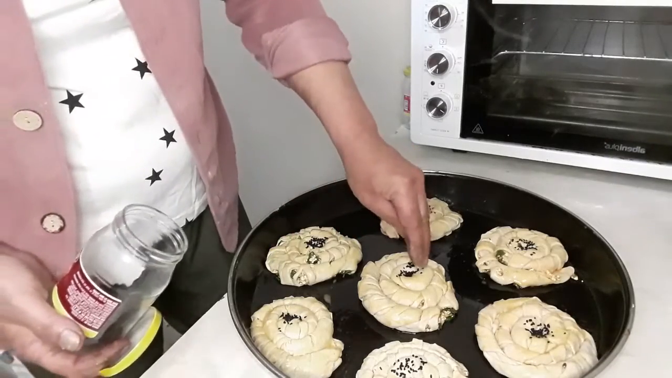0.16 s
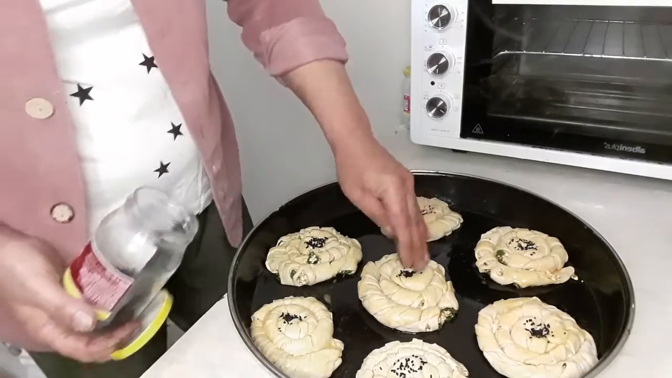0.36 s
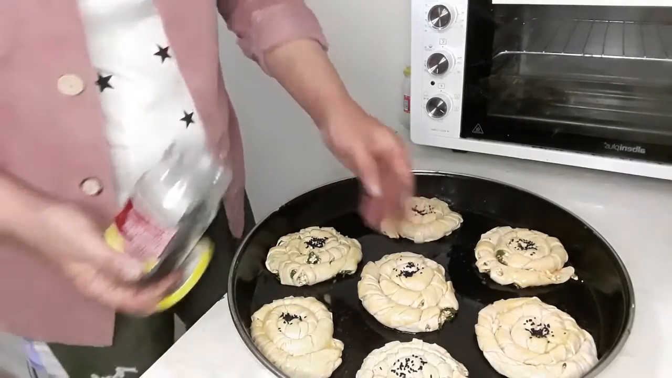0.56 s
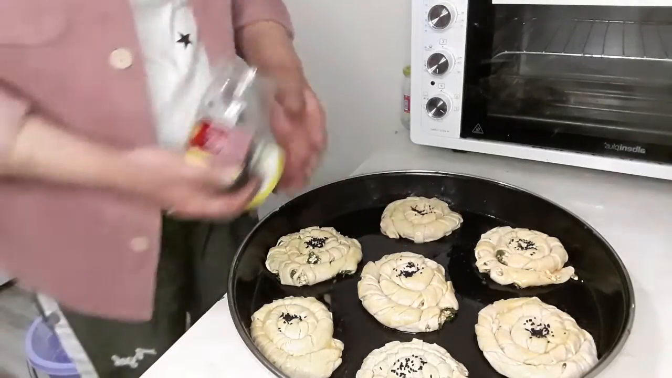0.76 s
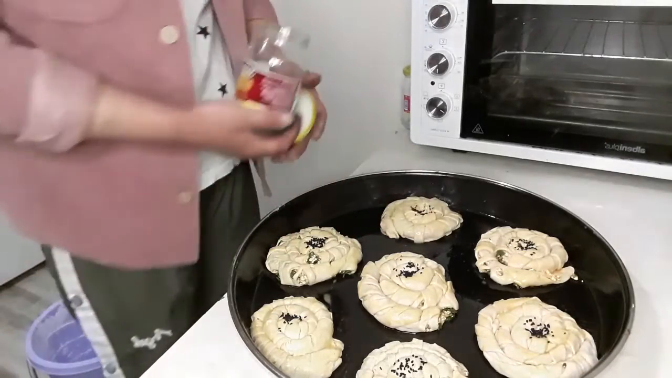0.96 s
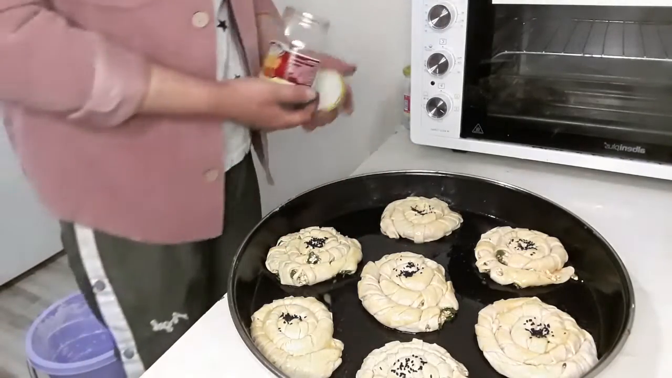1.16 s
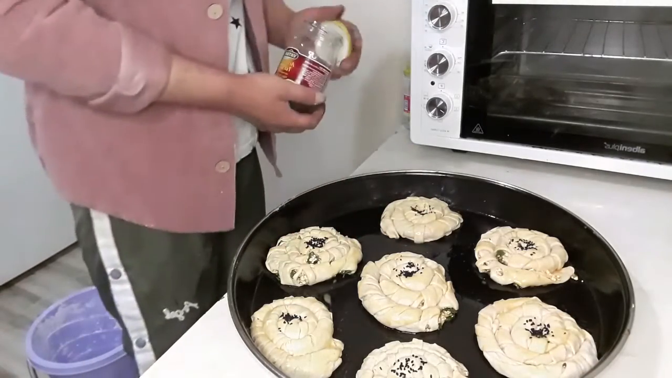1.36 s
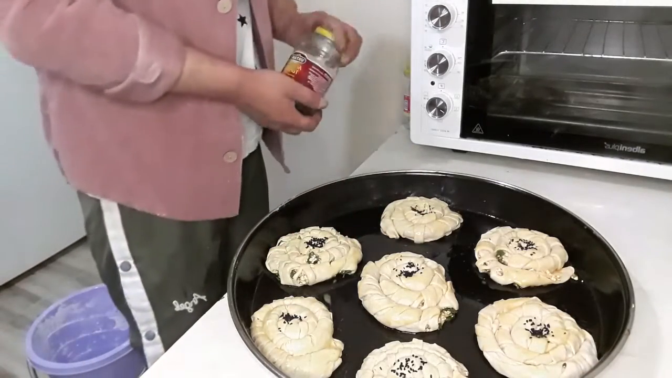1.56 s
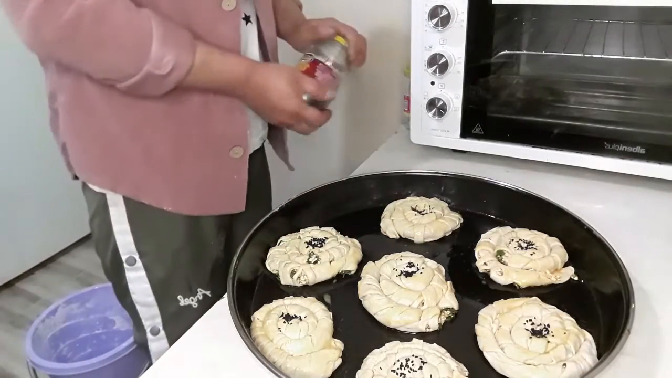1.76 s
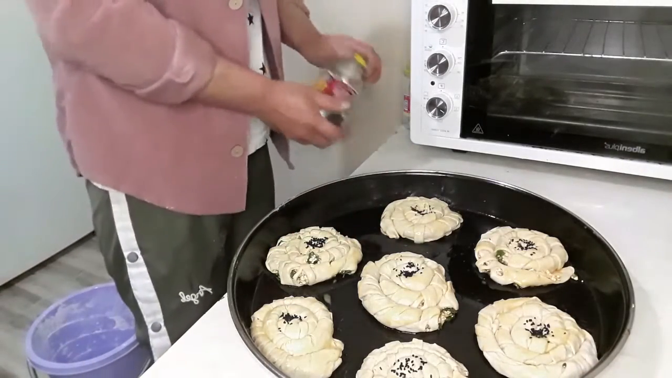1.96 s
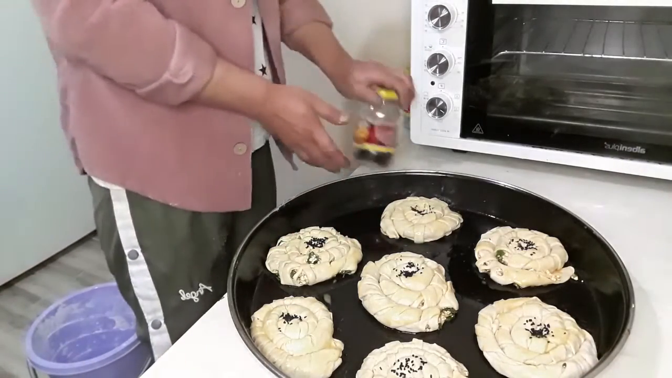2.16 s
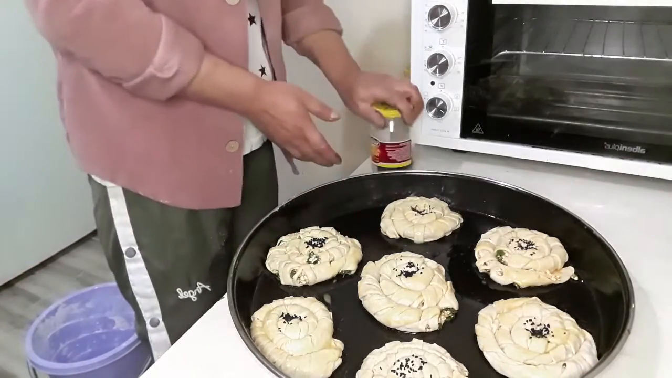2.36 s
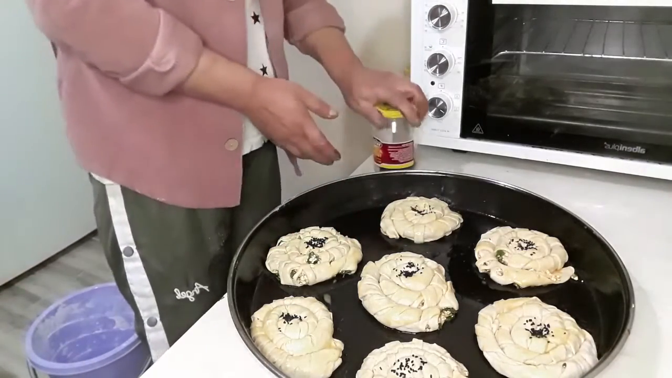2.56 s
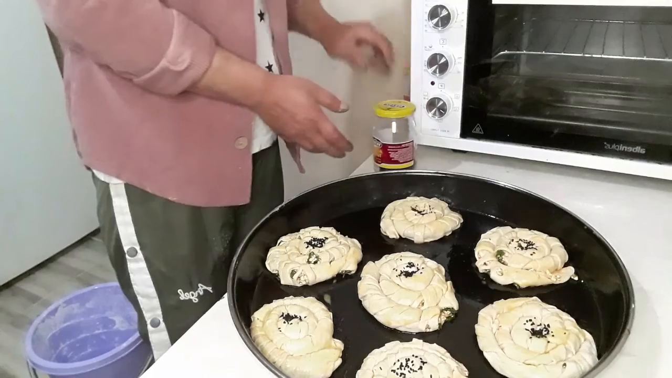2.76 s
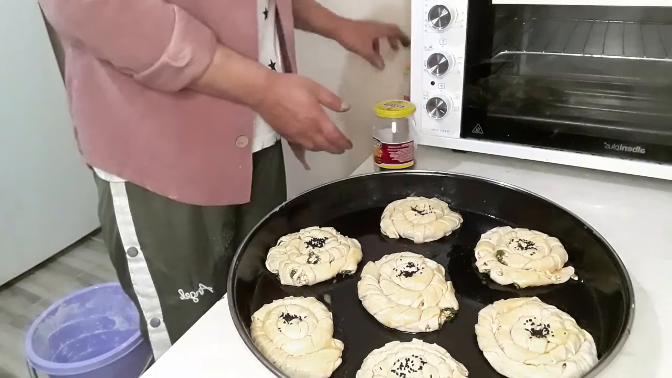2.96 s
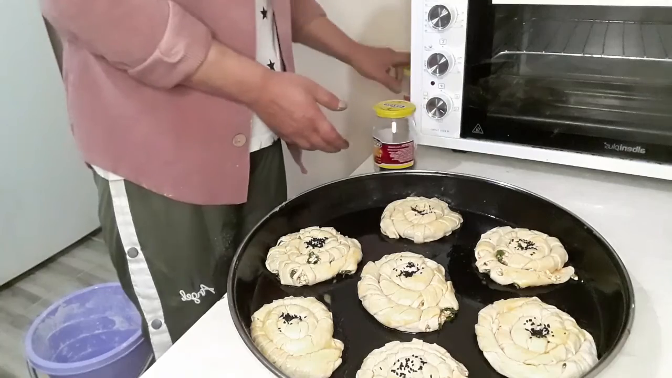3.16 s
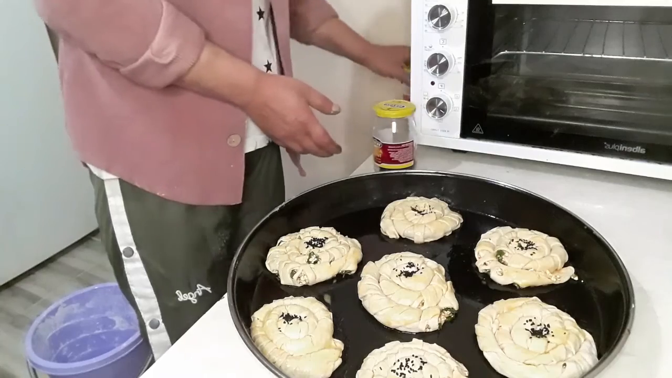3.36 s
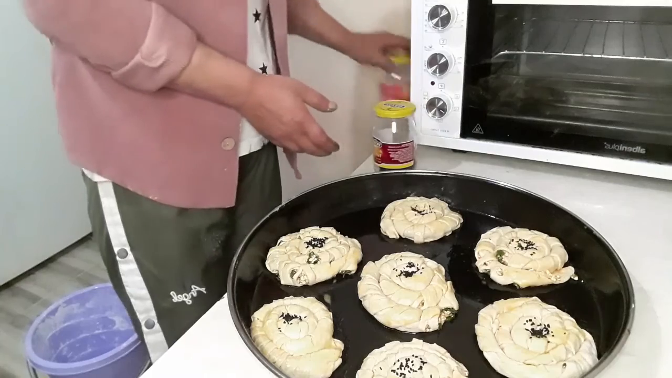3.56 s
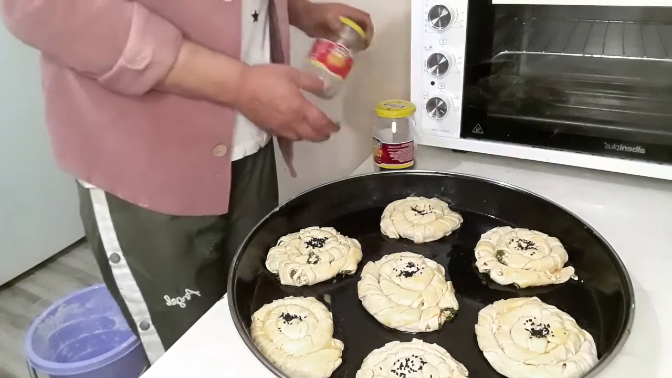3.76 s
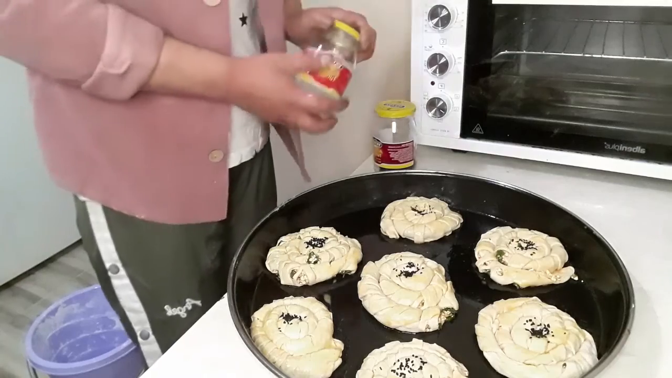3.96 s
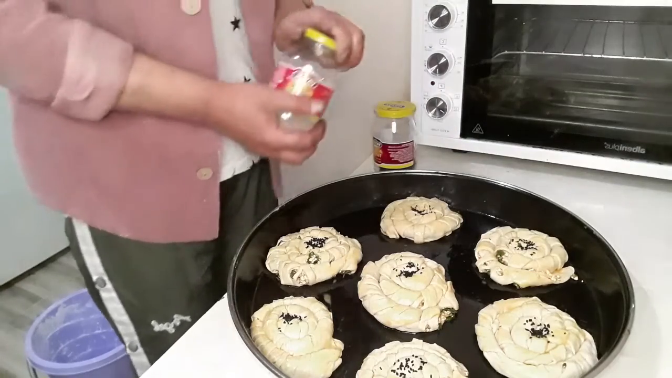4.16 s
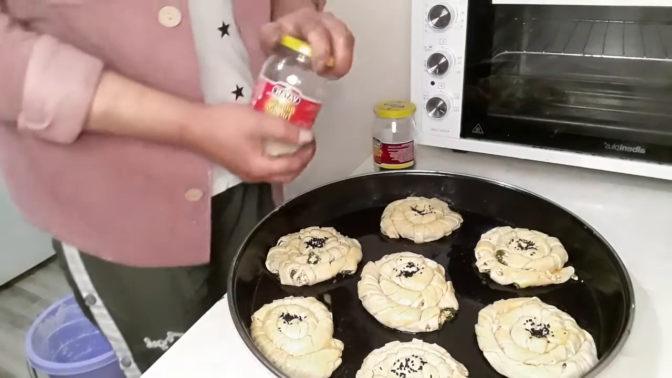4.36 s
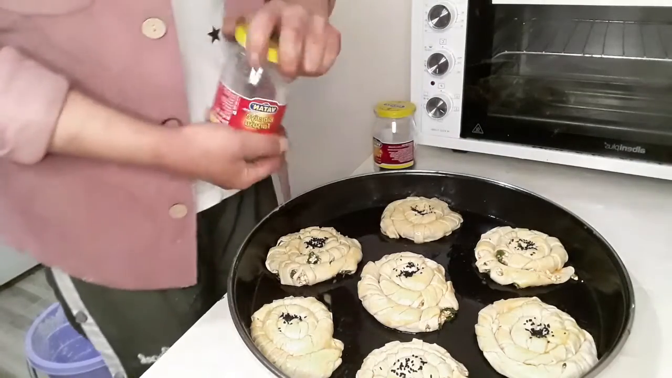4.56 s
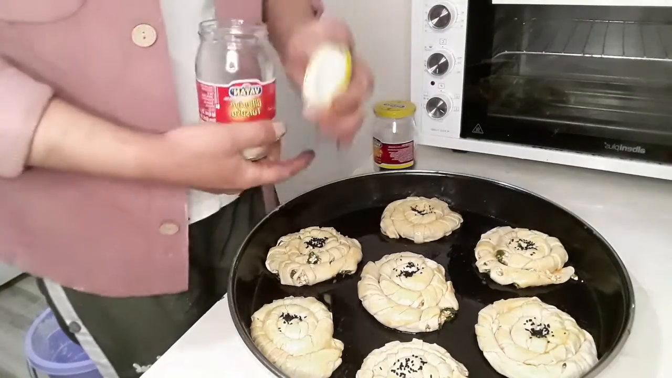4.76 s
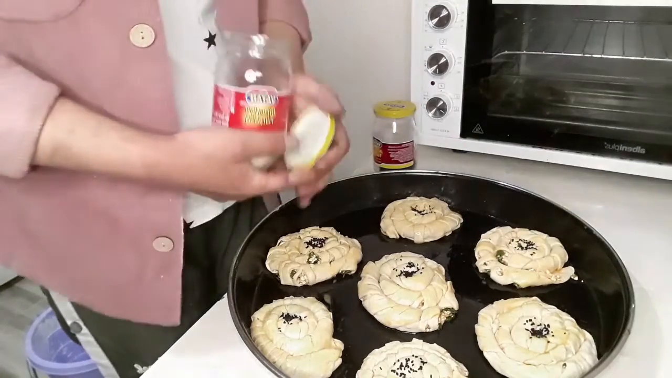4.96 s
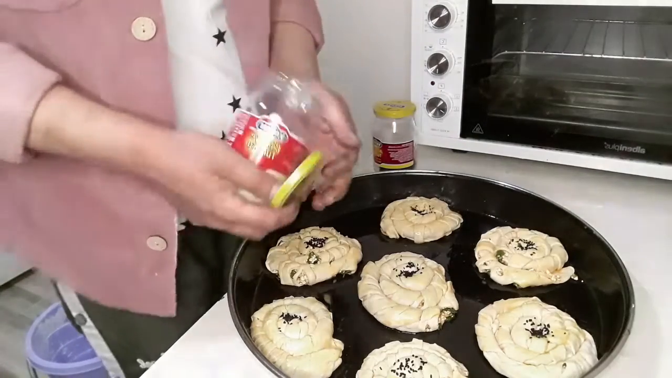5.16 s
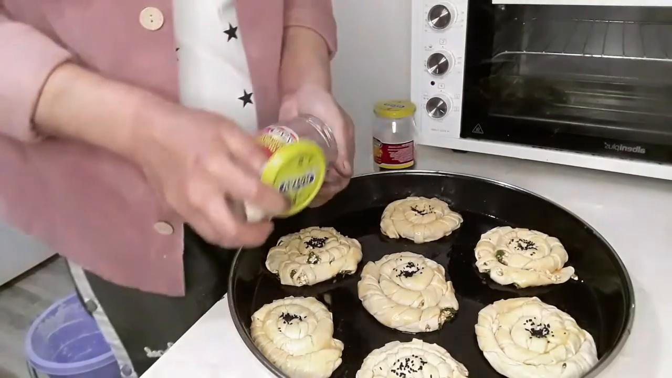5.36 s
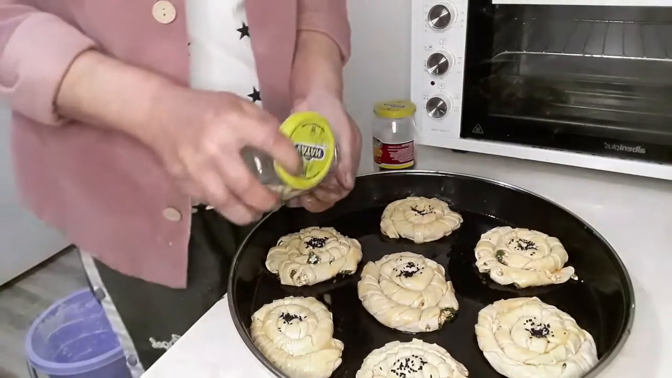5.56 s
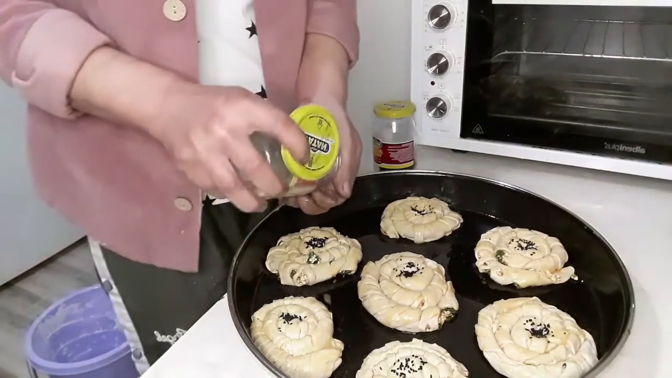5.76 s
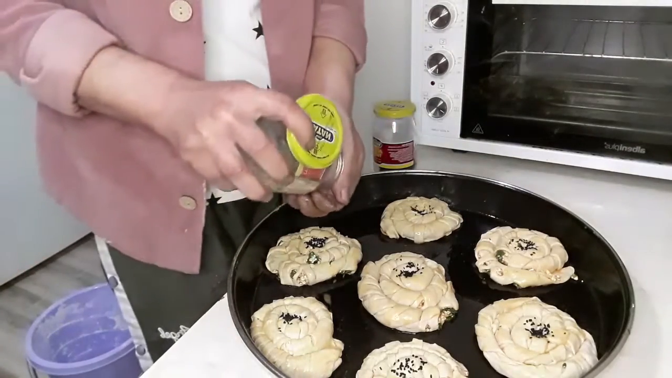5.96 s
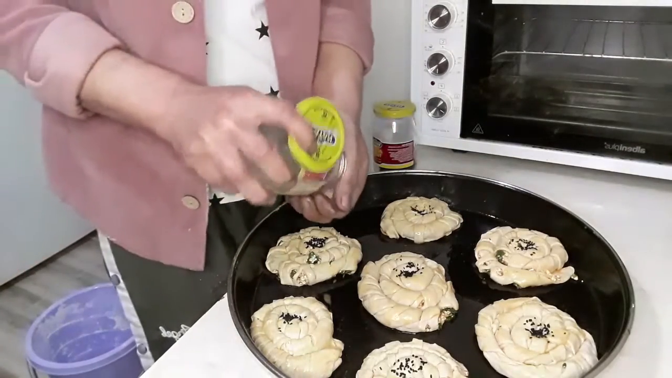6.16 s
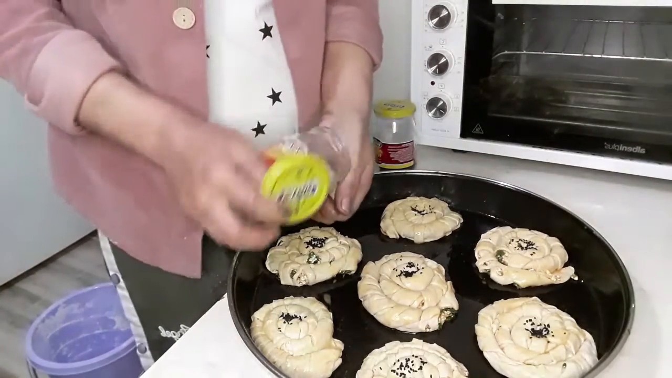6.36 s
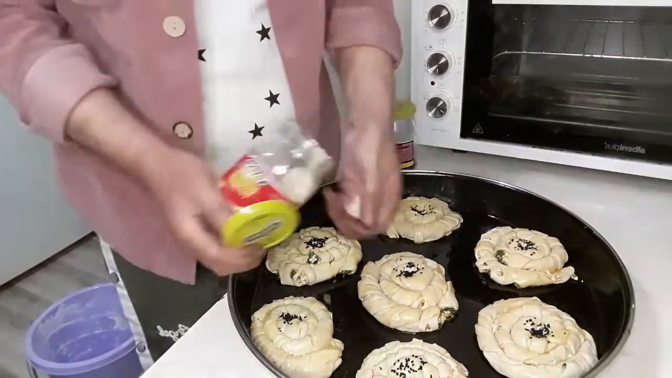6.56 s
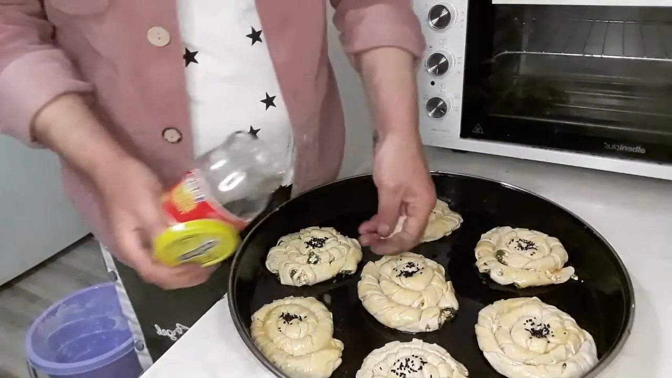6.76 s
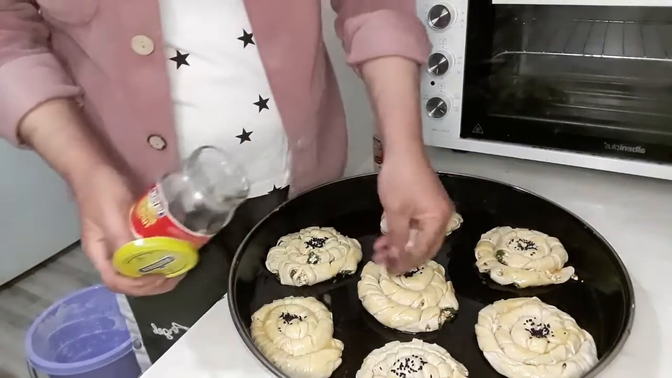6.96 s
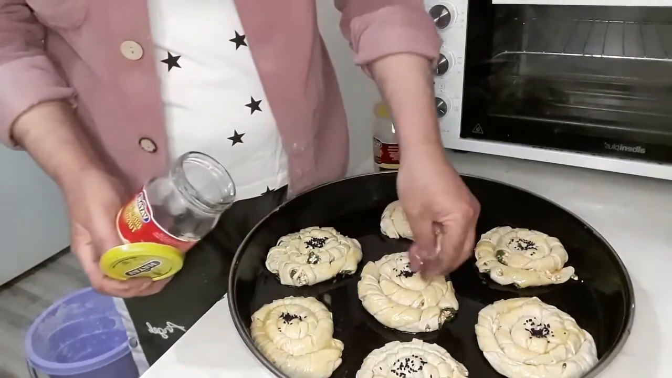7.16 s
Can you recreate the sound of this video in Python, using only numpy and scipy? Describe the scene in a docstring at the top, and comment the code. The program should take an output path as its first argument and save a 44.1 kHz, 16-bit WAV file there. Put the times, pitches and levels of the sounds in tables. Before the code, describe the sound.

A small jar is snapped shut and set down with rocking knocks; a larger jar scrapes away, pops open, and its lid clacks on glass.

```python
"""Plastic lids tap and snap over glass jars: short random contact forces excite damped modes of lid, glass and air.
The scene is a small, hard-walled kitchen. A small jar is lidded and lands on the countertop in rocking knocks;
a larger jar scrapes off by stick-slip friction, its lid pops by air resonance and clacks against its base.
Seeds patter as random grains in resonant glass, sleeves and fingertips hiss as bands of noise,
and an appliance hums in unsteady sines over the soft rush of the room."""
import sys
import numpy as np
from scipy import signal
from scipy.fft import rfft, irfft, next_fast_len
from scipy.io import wavfile
from scipy.ndimage import uniform_filter1d, map_coordinates

SR = 44100
rng = np.random.default_rng(int(sys.argv[2]) if len(sys.argv) > 2 else 0)


def wav_record(signal):
    """Record a signal, one row per channel, as 16-bit PCM in the file named by sys.argv[1]."""
    frames = np.transpose(np.atleast_2d(signal))
    bounded = np.clip(frames, -1, 1)
    # unit amplitude maps onto the largest positive 16-bit level
    quanta = np.round(bounded * 32767).astype(np.int16)
    wavfile.write(sys.argv[1], SR, quanta)


N = 318560
T = np.arange(SR) / SR  # the second after a blow
CLOCK = np.arange(N) / SR

# ringing modes of the small lid, the large lid and the jar's glass: [f/Hz, level/dB]
SMALL_LID = [(1190, -12), (2110, -7), (2460, -13.5), (3149, -14.5), (3830, -4), (4075, -2), (6030, -14.5)]
LARGE_LID = [(1620, -6.5), (2230, -3.5), (2855, -4.5), (3080, -4.5), (3710, -1.5), (4030, -6), (4660, -8.5),
             (5500, -7.5), (6300, -9), (8390, -4)]
GLASS = [(1760, -24), (2845, -7), (3830, -23.5), (5380, -24.5), (6470, -22)]
# force spectra of a cracking contact and of a jar's jolted body: [f/Hz, relative density/dB per Hz]
CRACK = [(40, -80), (300, -21), (900, -22.5), (1500, -4.5), (2100, -6), (2600, 3.5), (4000, 4),
         (5200, -1.5), (7500, -6), (10000, -10), (14000, -9.5), (16000, -18)]
BODY = [(30, -53.5), (125, -6), (200, -7), (320, 1), (450, 4.5), (700, 3.5), (1300, -10), (2500, -31.5),
        (8000, -66.5)]


def amp(db):
    """Level definition: decibels to amplitude gain."""
    return 10 ** (np.asarray(db) / 20)


def unit(x):
    """Power normalisation: x at rms 1."""
    return x / np.sqrt(np.mean(x ** 2) + 1e-20)


def blow(x, db):
    """Energy normalisation: x with the energy of 6 ms at the given rms level."""
    return amp(db) * x * np.sqrt(0.006 * SR / np.sum(x ** 2))


def along(points, hz):
    """Logarithmic pitch: (f/Hz, value) points read on a log-frequency axis."""
    f, v = np.transpose(points)
    return np.interp(np.log(hz + 1), np.log(f), v)


def add(track, s, x):
    """Superposition: mix x into the track from time s."""
    part = track[round(s * SR):][:len(x)]
    part += x[:len(part)]


def wobble(rate):
    """Slow fluctuation: a smooth curve through random knots, rate a second."""
    knots = rng.standard_normal(int(N * rate / SR) + 4)
    return map_coordinates(knots, [CLOCK * rate])


def filtered(x, response):
    """Linear filtering: the spectrum of x times a response of frequency."""
    m = next_fast_len(x.shape[-1] + SR // 2)
    spectrum = rfft(x, m) * response(np.fft.rfftfreq(m, 1 / SR))
    return irfft(spectrum, m)[..., :x.shape[-1]]


def resonate(x, peaks):
    """Forced resonance: x through parallel damped oscillators (f/Hz, width/Hz, peak gain/dB)."""
    def response(f):
        return sum(amp(db) * 1j * f * w / (c * c - f * f + 1j * f * w) for c, w, db in peaks)
    return filtered(x, response)


def causal(gain):
    """Minimum phase: the response with these gains that rings only after the blow."""
    cepstrum = irfft(np.log(gain), SR)
    cepstrum[1:SR // 2] *= 2
    cepstrum[SR // 2 + 1:] = 0
    return np.exp(rfft(cepstrum))


def flurry(envelope):
    """Broadband excitation: a force of microscopic touches, evened out over frequency."""
    force = rfft(rng.choice([-1, 1], SR) * envelope)
    smooth_gain = np.sqrt(uniform_filter1d(abs(force) ** 2, size=120))
    return irfft(force / causal(smooth_gain), SR)


def burst(spectrum, bright_db, t60):
    """Contact force: a decaying flurry through a causal colour; a harder touch tilts it to the treble."""
    hz = np.fft.rfftfreq(SR, 1 / SR)
    tilt_db = bright_db * np.log2(1 + hz / 500)
    colour = causal(amp(along(spectrum, hz) + tilt_db))
    force = flurry(amp(-60 * (T / t60) ** 0.91))
    return irfft(rfft(force) * colour, SR)


def tone(hz, t60, rise_s=0.0004):
    """Damped oscillation: one mode builds up during contact and decays exponentially."""
    vibration = np.sin(2 * np.pi * (hz * T + rng.random()))
    return vibration * amp(-60 * T / t60) * (1 - np.exp(-T / rise_s))


def ring(modes, t60):
    """Modal superposition: a struck object's modes share the decay that the grip allows."""
    return sum(rng.choice([-1, 1]) * amp(db + rng.normal(0, 1)) * tone(hz, t60) for hz, db in modes)


def soften(x, db):
    """Contact duration: a gentler snap touches for longer and loses its top."""
    full_snap_db, dulling = -26, 0.5
    top_hz = 18000 * amp(dulling * (db - full_snap_db))
    return signal.sosfilt(signal.butter(2, top_hz, fs=SR, output="sos"), x)


def held(length):
    """Finite contact: nearly full strength for a short time, then quickly gone."""
    return np.exp(-(T / length) ** 4)


def swell(s, length):
    """Gaussian envelope: a soft rise and fall around time s."""
    return np.exp(-(2 * (CLOCK - s) / length) ** 2)


def stroke(s, length, attack_s, fall_db_per_s):
    """Friction envelope: a linear rise from time s, a hold to s + length, an exponential fall."""
    attack = np.clip((CLOCK - s) / attack_s, 0, 1)
    return attack * amp(-fall_db_per_s * np.maximum(CLOCK - s - length, 0))


def grains(rate):
    """Poisson-like impacts: tiny random blows at random moments, rate a second on average."""
    return (rng.random(N) < rate / SR) * rng.standard_normal(N)


def hiss(hz, octaves):
    """Band noise: a Gaussian band on a log-frequency axis at rms 1."""
    band = lambda f: np.exp(-0.5 * (np.log2((f + 1) / hz) / octaves) ** 2)
    return unit(filtered(rng.standard_normal(N), band))


def in_room(x, room_db, build_s=0.00091):
    """Diffuse reverberation: x plus a dense random tail, redrawn each time as places differ."""
    # decay of the kitchen's reverberation: [f/Hz, t60/s]
    kitchen_decay = [(100, 1), (220, 1), (400, 0.56), (2000, 0.41), (5000, 0.4), (12000, 0.28)]
    hz, t, z = signal.stft(rng.standard_normal(SR), SR, nperseg=512)
    decay = amp(-60 * t / along(kitchen_decay, hz)[:, None])
    tail = signal.istft(z * decay, SR, nperseg=512)[1][:SR]
    spectrum = rfft(tail * (1 - np.exp(-T / build_s)))
    spectrum /= np.sqrt(uniform_filter1d(abs(spectrum) ** 2, size=60))  # the walls return all bands evenly
    response = irfft(1 + amp(room_db) * spectrum, SR)[:3 * SR // 4]  # 1 is the direct sound
    return signal.fftconvolve(x, response)[:len(x)]


def background():
    """Periodic and turbulent noise: an appliance motor's unsteady sines over the room's soft rush."""
    # partials of the hum: [f/Hz, level/dB]
    partials = [(49.5, -80), (99, -65.5), (199.5, -73.5), (300, -73.5), (399, -75.5), (442, -71.5),
                (1082, -84)]
    # spectrum of the rush: [f/Hz, relative density/dB per Hz]
    rush_spectrum = [(25, -18.5), (50, -8), (62, -19), (80, -10.5), (130, -5.5), (220, -13), (440, -8.5),
                     (620, -20), (820, -24), (1050, -25.5), (1400, -31.5), (2500, -32.5), (3900, -27),
                     (6000, -35.5), (15000, -38.5)]
    hum = 0
    for hz, db in partials:
        phase = 2 * np.pi * hz * CLOCK + 0.55 * wobble(1.32)
        hum = hum + amp(db + 0.43 * wobble(18)) * np.sin(phase)
    rush = unit(filtered(rng.standard_normal(N), lambda hz: amp(along(rush_spectrum, hz))))
    return hum + amp(-65 + 0.55 * wobble(3.2)) * rush


def brushing():
    """Friction noise: sleeves and fingertips brush past in soft swells of band noise."""
    # a sleeve sweeps over the jacket: [t/s, level/dB, length/s, centre f/Hz]
    sleeves = [(0.34, -66, 0.065, 4200), (0.396, -68, 0.081, 3900), (0.92, -79, 0.48, 4000),
               (2.348, -64.5, 0.056, 4170), (4.136, -77.5, 0.54, 4420), (5.96, -80, 0.14, 3400),
               (7.08, -75.5, 0.16, 3900)]
    # fingertips slip on glass and lid: [t/s, level/dB, length/s]
    fingers = [(0.14, -75, 0.05), (1.361, -60, 0.042), (1.542, -59.5, 0.061)]
    sweeps = sum(amp(db) * swell(s, length) * hiss(hz, octaves=0.25) for s, db, length, hz in sleeves)
    slips = sum(amp(db) * swell(s, length) for s, db, length in fingers)
    return in_room(sweeps + slips * hiss(6200, octaves=0.77), room_db=2.0)


def seeds(shift_db=3.0, clump_db=3):
    """Granular excitation: seeds patter in clumps, stirring now one mode of a tilted jar, now another."""
    # seeds slide: [t/s, level before the cut below/dB, length/s]
    seed_slides = [(1.024, -68, 0.33), (2.093, -65.5, 0.11), (3.715, -68, 0.13), (4.09, -71.5, 0.31),
                   (5.532, -63.5, 0.27), (6.23, -70.5, 0.27), (6.751, -68, 0.28)]
    # the jar's wall under the seeds: [f/Hz, width/Hz, level/dB]
    jar_wall = [(2870, 80, -3), (4000, 660, -4.5), (5580, 200, 2.5), (6380, 200, -1.5), (8450, 450, 1.5),
                (12330, 670, -4)]
    flow = sum(amp(db) * swell(s, length) for s, db, length in seed_slides)
    patter = grains(1500) * amp(clump_db * wobble(30))
    wall = sum(amp(shift_db * wobble(5.6)) * resonate(patter, [mode]) for mode in jar_wall)
    return amp(-7.5) * in_room(flow * unit(wall), room_db=7.0)


def drag():
    """Stick-slip friction: the large jar's base scrapes; the slab's rumble outlasts it until the jar is lifted."""
    # the base scrapes over the counter: [t/s, length/s, level/dB]
    slides = [(3.187, 0.055, -32.5), (3.382, 0.029, -44.5)]
    # colour of the scrape: [f/Hz, relative density/dB per Hz]
    scrape_spectrum = [(40, -58), (120, -33), (200, -14), (480, -5), (670, -8), (920, -7), (1150, -12.5),
                       (2100, -17.5), (4300, -19), (8700, -27), (16000, -38)]
    # the slab's low modes under the moving weight: [f/Hz, width/Hz, level/dB]
    slab_modes = [(80, 11, -16), (134.4, 11, -5), (181.7, 7.5, 3.5), (323, 38, -8.5), (447, 33, -13)]
    attack_s = 0.013  # friction builds up as the jar starts to move
    scrape = sum(amp(db) * stroke(s, length, attack_s, fall_db_per_s=453) for s, length, db in slides)
    shake = amp(-38) * stroke(slides[0][0], 0.25, attack_s, fall_db_per_s=80)
    slips = np.tanh(2 * grains(2200))  # friction caps the force of a slip
    grit = scrape * unit(filtered(slips, lambda hz: amp(along(scrape_spectrum, hz))))
    # the slab radiates between about 70 and 700 Hz
    radiation = lambda hz: 1 / (1 + (hz / 700) ** 4 + (70 / (hz + 1)) ** 6)
    slab = filtered(resonate(slips, slab_modes), radiation)
    return in_room(grit, room_db=3.0) + shake * unit(slab)


def set_down(slab_db=-16, tink_db=-19, bright_db=0.66, count=5):
    """Impact and plate bending: the small jar lands on one edge and rocks flat; the countertop booms."""
    # colour of a knock: [f/Hz, relative density/dB per Hz]
    thud = [(30, -66), (75, -13.5), (100, -45), (130, -12), (180, -8), (225, -11), (480, -4), (900, -7),
            (1350, -17), (1800, -16.5), (2300, -23), (4400, -28.5), (5500, -35), (16000, -61.5)]
    # modes of the countertop: [f/Hz, level/dB]
    counter = [(335, -7), (451, -4), (474, 2), (600, -1), (800, 0.5)]
    land_s, land_db = 2.364, -24.5
    rock_gap_s, rock_db, rock_loss_db = 0.0088, -21, 2.04  # each rocking knock is weaker than the last
    rocks = [(land_s + (k + 1) * rock_gap_s, rock_db - rock_loss_db * k) for k in range(count)]
    out = np.zeros(N)
    for s, db in [(land_s, land_db)] + rocks:
        knock = blow(burst(thud, bright_db, t60=0.052), db)
        tink = blow(tone(4490, t60=0.092), db + tink_db)
        add(out, s, in_room(knock, room_db=-1.0, build_s=0.0021) + tink)
    boom = ring(counter, t60=0.14) * (1 - np.exp(-T / 0.025))
    bend = tone(129, t60=0.41, rise_s=0.023)  # a low bending mode of the slab, slow to build up
    add(out, land_s, blow(boom, slab_db + 0.5) + blow(bend, slab_db - 3.5))
    return out


def pops(rise_s=0.003, glide_s=0.04, t60=0.031, linger_db=-17, overtone=0.19, puff_db=-9):
    """Helmholtz resonance: air bounces in the jar's neck, its pitch rising; the lid's lip flicks the glass."""
    # a mouth is closed or opened: [t/s, level/dB, starting f/Hz, pitch rise/share, lingering length/s,
    # lip tick level/dB, glass ring level/dB, room level/dB]
    mouths = [(1.588, -28, 422, 0.25, 0.02, -39.5, -50.5, -2.5),
              (4.6408, -19.5, 394.5, .37, 0.042, -38.5, -36.5, -12.5)]
    out = np.zeros(N)
    for s, db, hz, glide, length, tick_db, glass_db, room_db in mouths:
        pitch = hz * (1 + glide * (1 - np.exp(-T / glide_s)))
        phase = 2 * np.pi * np.cumsum(pitch) / SR
        rise = 1 - np.exp(-T / rise_s)
        bounce = amp(-60 * T / t60) * (np.sin(phase) + overtone * np.sin(2 * phase))
        linger = amp(linger_db) * held(length) * np.sin(phase)  # while the lid moves
        air = blow(rise * (bounce + linger), db)
        puff = blow(burst(BODY, 0, t60=0.09) * rise, db + puff_db)
        flick = blow(burst(CRACK, -1.1, t60=0.032), tick_db) + blow(ring(GLASS, t60=0.12), glass_db)
        add(out, s, in_room(air + puff, room_db))
        add(out, s + 0.0035, in_room(flick, room_db=-3))
    return out


def lid_rubs():
    """Friction-driven resonance: the plastic skirt chatters along the rim and stirs the air in the jar."""
    # a skirt rubs before it lets go or seats: [t/s, level/dB, length/s, jar air level/dB, jar air f/Hz]
    rubs = [(1.56, -46, 0.018, -60, 468), (1.576, -41.5, 0.02, -42.5, 472), (1.622, -39, 0.008, -51, 465),
            (4.625, -60, 0.06, -48.5, 344)]
    # the rubbed skirt's resonances: [f/Hz, width/Hz, level/dB]
    skirt_modes = [(1680, 70, -9), (2437, 81, -1.5), (2770, 200, -8.5), (3820, 60, 0), (5070, 90, -15.5),
                   (8950, 180, -14)]
    out = np.zeros(N)
    for s, db, length, air_db, air_hz in rubs:
        slips = np.sign(grains(3300))[:SR]
        skirt = amp(db) * unit(resonate(slips, skirt_modes))
        air = amp(air_db) * unit(resonate(slips, [(air_hz, 40, 0)]))
        out += swell(s, length) * np.resize(skirt + air, N)
    return in_room(out, room_db=0.5)


def rattle(rim_db=-7.5, tick_db=-3.0):
    """Repeated impact: each light touch of a lid on glass is a tick and a short ring of its rim."""
    # light touches as the lid rattles after a snap: [t/s, which jar, level/dB, brightness/dB per octave]
    touches = [(1.6385, "small", -35, -2.5), (1.6658, "small", -36.5, -8), (1.745, "small", -45.5, -4),
               (4.9884, "large", -37, -11), (4.993, "large", -30, -7.5), (5.0376, "large", -38.5, -10.5)]
    out = np.zeros(N)
    for s, jar, db, bright_db in touches:
        rim = ring(LARGE_LID if jar == "large" else SMALL_LID, t60=0.022)
        tick = burst(CRACK, bright_db, t60=0.02)
        add(out, s, blow(tick, db + tick_db) + blow(rim, db + rim_db))
    return in_room(out, room_db=-6.0)


def clacks():
    """Damped contact resonance: the large lid buzzes on the jar's base; the hands damp its ring at once."""
    # lid meets base: [t/s, level/dB, chatter/s, top f/Hz, room level/dB]
    contacts = [(5.1053, -25.5, 0.0075, 9000, -2), (5.2879, -34, 0.0042, 6170, -1.5)]
    # the lid held against the base: [f/Hz, width/Hz, level/dB]
    base_modes = [(1005, 103, -4.5), (2610, 120, 3), (2940, 340, 0.5), (3900, 510, -3), (4440, 390, -2),
                  (5250, 630, -0.5), (6580, 600, -1), (7370, 180, -3.5), (10900, 810, -9.5)]
    out = np.zeros(N)
    for s, db, chatter_s, top_hz, room_db in contacts:
        low_pass = signal.butter(2, top_hz, fs=SR, output="sos")
        force = signal.sosfilt(low_pass, flurry(held(chatter_s)))
        add(out, s, in_room(blow(resonate(force, base_modes), db), room_db))
    return out


def lids(tink_db=-1.0):
    """Impact and snap-through: lids tap the rim, then crack over it; panel, skirt, rim, glass and jar respond."""
    # a loose lid taps the glass rim: [t/s, level/dB, room level/dB]
    taps = [(1.4273, -33.5, 4.5)]
    # a lid snaps over glass: [t/s, which jar, crack level/dB, brightness/dB per octave, panel f/Hz,
    # panel level/dB, skirt f/Hz, skirt level/dB, rim ring level/dB, jolt level/dB, room level/dB]
    snaps = [(1.5897, "small", -41, -9, 800, -45, 1686, -49.5, -42, -37.5, 3.5),
             (1.6253, "small", -29.5, 0, 684, -31.5, 3030, -36, -28, -39, -0.5),
             (1.6350, "small", -34.5, -3, 793, -35.5, 2460, -33.5, -32.5, -39, 0.5),
             (4.428, "large", -37, 1.5, 844, -35, 1360, -48, -43, -38, 4),
             (4.9445, "large", -28.5, 1.5, 897, -30.5, 2202, -32.5, -26, -41.5, 2.4)]
    # ringing modes of the loose lid: [f/Hz, level/dB]
    loose_lid = [(547, -11.5), (1089, -7), (1660, -1), (2110, -4), (2907, -23), (4250, -12.5),
                 (5168, -19.5), (6600, -15.5), (7402, -25), (9000, -22)]
    # colour of its tick on the rim: [f/Hz, relative density/dB per Hz]
    tink_spectrum = [(100, -65), (1300, -15), (1780, 8.5), (2400, -13.5), (2900, 2.5), (3800, -16.5),
                     (15000, -37.5)]
    out = np.zeros(N)
    for s, db, room_db in taps:
        tink = blow(burst(tink_spectrum, 0, t60=0.015), db + tink_db)
        tap = blow(ring(loose_lid, t60=0.078), db) + tink
        add(out, s, in_room(tap, room_db))
    for (s, jar, db, bright_db, panel_hz, panel_db, skirt_hz, skirt_db,
         rim_db, jolt_db, room_db) in snaps:
        crack = blow(soften(burst(CRACK, bright_db, t60=0.02), db), db)
        panel = blow(tone(panel_hz, t60=0.046), panel_db)
        skirt = blow(tone(skirt_hz, t60=0.035), skirt_db)
        rim = blow(ring(LARGE_LID if jar == "large" else SMALL_LID, t60=0.028), rim_db)
        # only the large jar's wall rings along, 10.5 dB below the crack
        glass = blow(ring(GLASS, t60=0.3), db - 10.5) if jar == "large" else 0
        jolt = blow(burst(BODY, 0, t60=0.0047), jolt_db)
        add(out, s, in_room(crack + panel + skirt + rim + glass + jolt, room_db))
    return out


def scene():
    """Superposition: all sources reach both channels alike; each channel adds its own faint white hiss."""
    surroundings = background() + brushing() + seeds()
    jars = drag() + set_down() + pops()
    lid_contacts = lid_rubs() + rattle() + clacks() + lids()
    return surroundings + jars + lid_contacts + amp(-78.5) * rng.standard_normal((2, N))


def record(dry, low_cut_hz=45):
    """Band limiting: a high-pass thins the deep bass and a steep low-pass removes the extreme treble."""
    high_pass = signal.butter(3, low_cut_hz, "highpass", fs=SR, output="sos")
    thinned = signal.sosfilt(high_pass, dry)
    top_hz = 16100
    return filtered(thinned, lambda hz: 1 / np.sqrt(1 + (hz / top_hz) ** 200))


dry = scene()
out = record(dry)
wav_record(out)
```